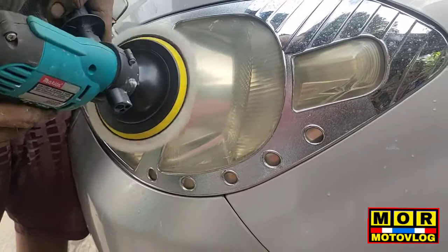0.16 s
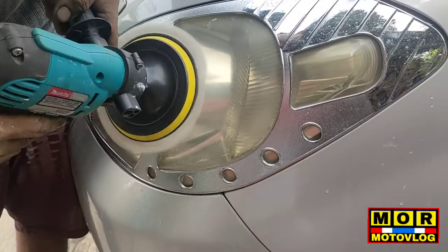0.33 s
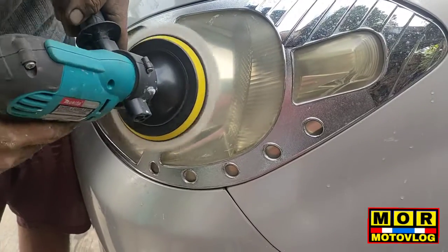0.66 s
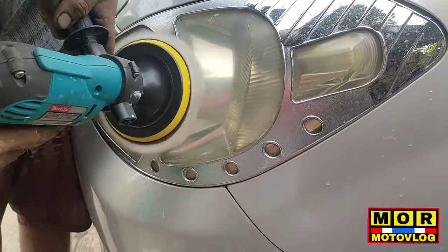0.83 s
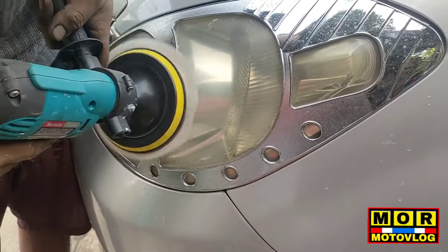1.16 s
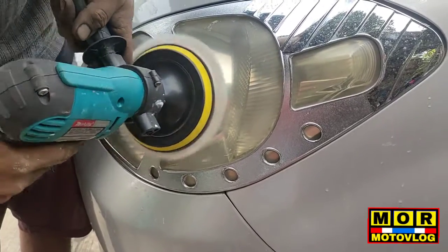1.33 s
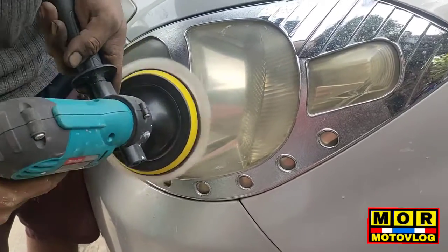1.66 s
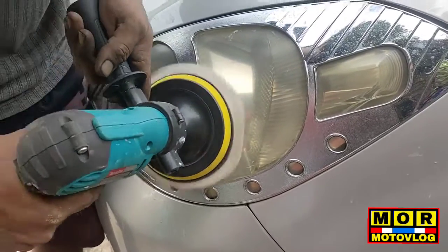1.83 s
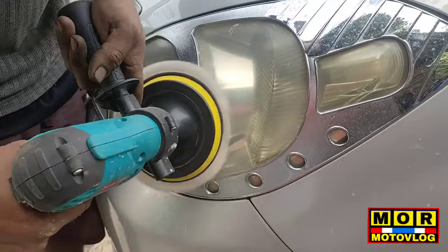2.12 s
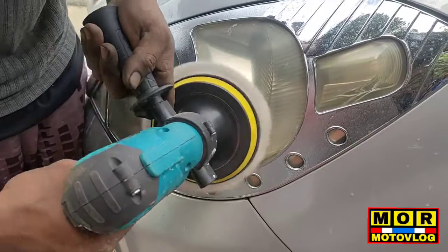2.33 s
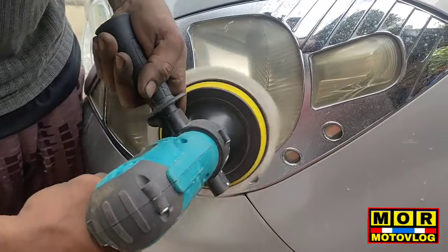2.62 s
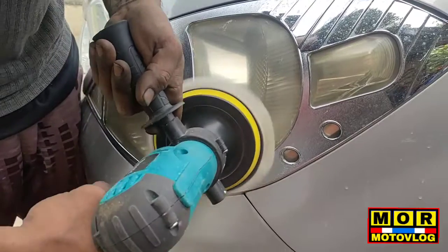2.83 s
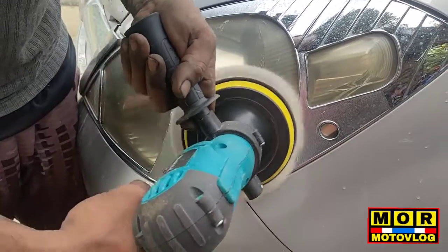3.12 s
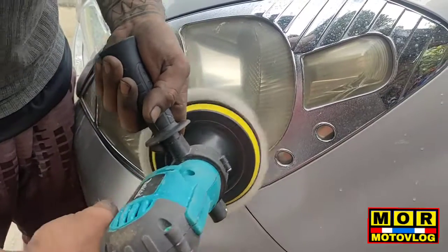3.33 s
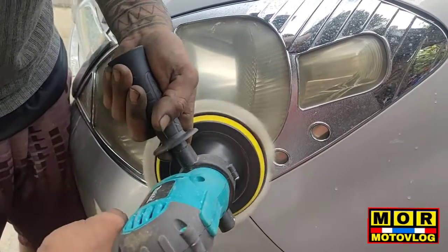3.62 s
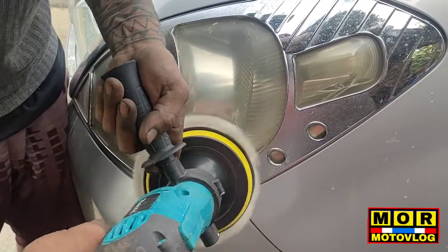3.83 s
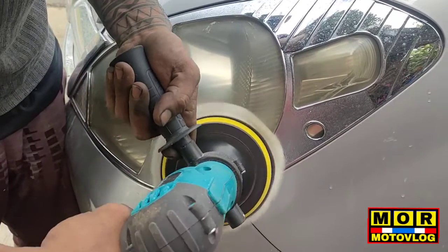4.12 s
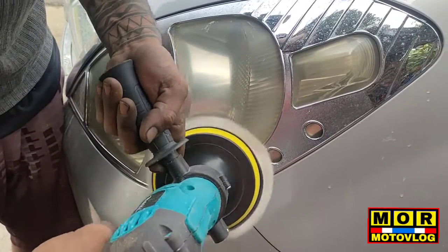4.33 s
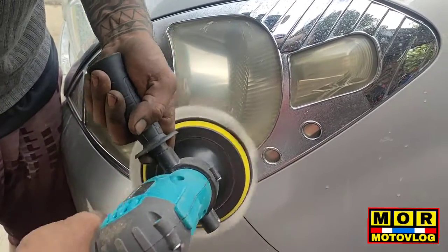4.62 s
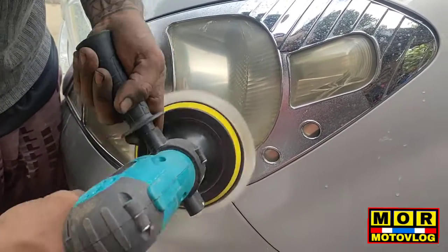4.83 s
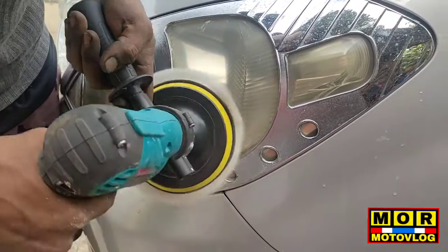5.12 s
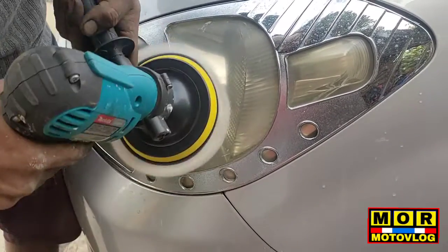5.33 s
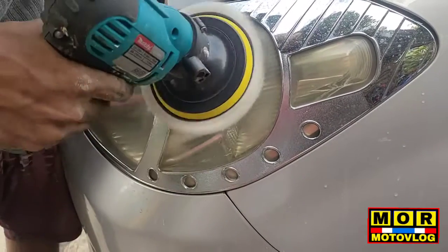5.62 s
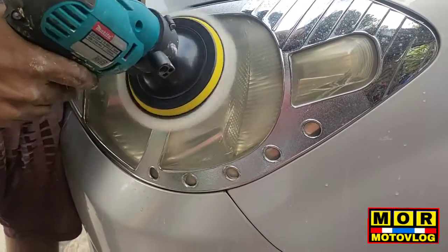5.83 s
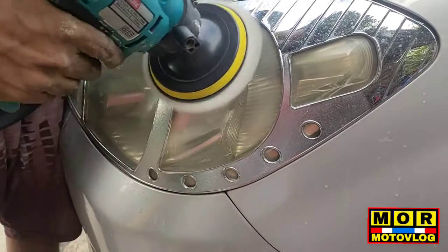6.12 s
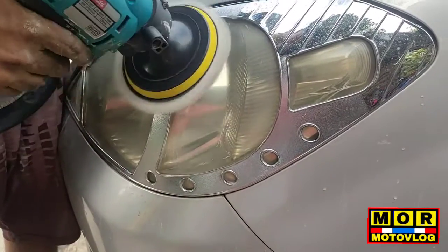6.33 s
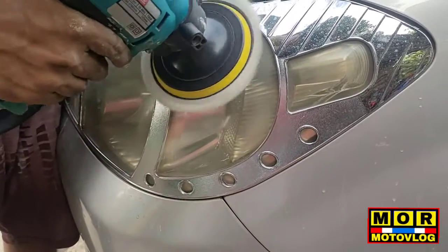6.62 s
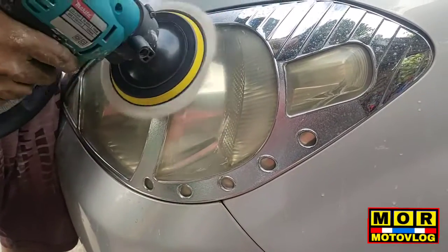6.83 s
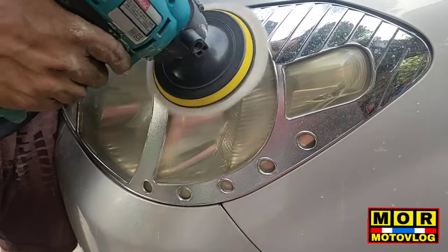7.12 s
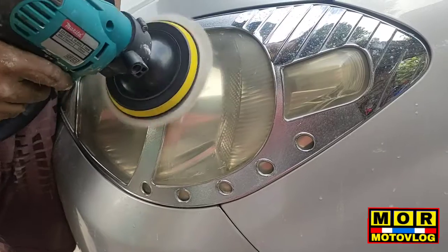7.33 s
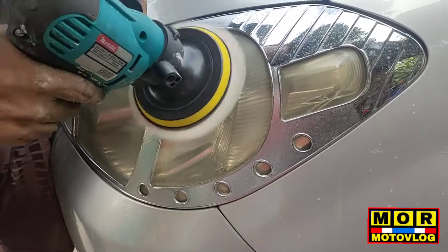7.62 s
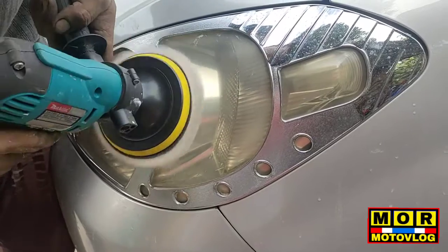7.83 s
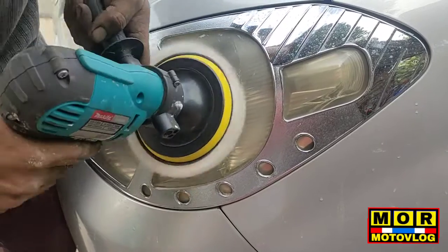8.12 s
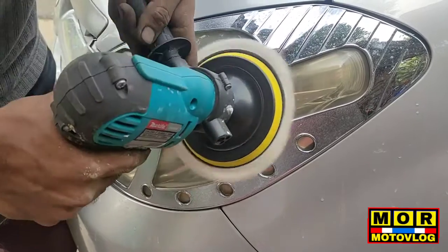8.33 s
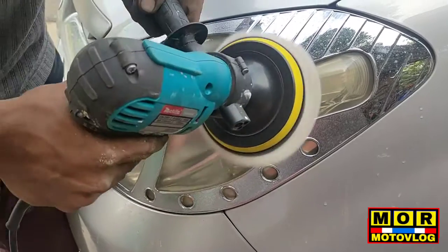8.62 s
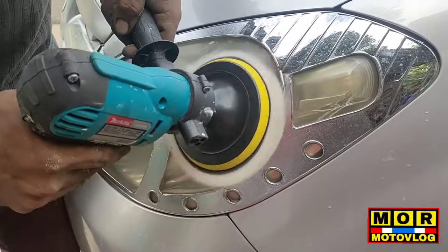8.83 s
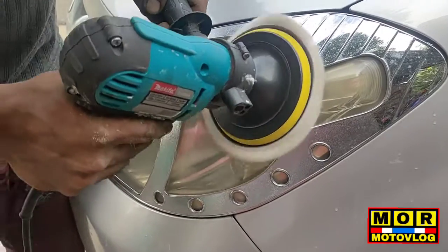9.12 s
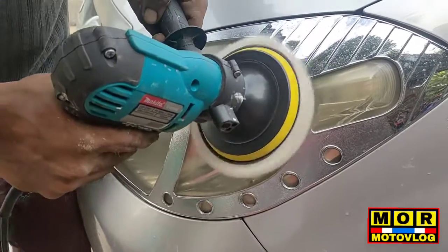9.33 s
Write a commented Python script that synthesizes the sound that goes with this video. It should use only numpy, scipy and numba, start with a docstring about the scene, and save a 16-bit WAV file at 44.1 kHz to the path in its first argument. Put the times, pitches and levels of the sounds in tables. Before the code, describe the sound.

A power buffer already at full speed whines and roars right by the microphone, outdoors, with a short reflection off the ground and shifting, slightly hollow coloration. Its tone dips under pressure around the middle, then rises and stays brighter and higher with small wavers. Broad airy hiss surges with the strokes, a soft pad drone lies beneath, weak low hums come and go, and a muffled bump occurs near eight seconds.

```python
"""A hand-held electric polisher with a wool pad works over a plastic headlight outdoors, heard in stereo close by.
Sines on multiples of the sagging and recovering rotor speed make the whine of gear teeth, fan and commutator.
Bands of noise make the pad's drone, the casing's roar and the hiss of vents and brushes; an echo off the ground
and moving hollows colour the casing, gear, vent and brush noise. The tool is held in five ways in turn.
Behind it low sine hums swell and fade over a faint noise rumble; once, struck modes make a dull bump."""
import sys
import numpy as np
from scipy import signal
from scipy.fft import rfft, irfft, next_fast_len
from scipy.io import wavfile
from scipy.ndimage import uniform_filter1d, map_coordinates
from numba import njit

SR = 44100
rng = np.random.default_rng(int(sys.argv[2]) if len(sys.argv) > 2 else 0)


def dump_mix(stems):
    """Bounce the given channels to the path in sys.argv[1] as a 16-bit WAV at rate SR."""
    frames = np.atleast_2d(stems).T  # one column per channel
    limited = np.clip(frames, -1, 1)  # hard clip at full scale
    pcm = np.round(limited * 32767).astype(np.int16)
    wavfile.write(sys.argv[1], SR, pcm)


N = 417627


def rotor_speed():
    """Rotor turns per second under the changing load; inertia rounds the corners."""
    # rotor speed before rounding: t/s, speed/(turns per s)
    rotor_curve = [(0.0, 379.2), (0.15, 380.5), (0.6, 378.0), (0.79, 382.8), (1.0, 374.4), (1.19, 378.3),
                   (1.39, 371.3), (1.59, 378.0), (1.84, 370.4), (2.0, 373.8), (2.23, 370.8), (2.5, 381.4),
                   (2.88, 379.3), (3.11, 363.8), (3.35, 360.8), (3.55, 353.0), (3.99, 354.6), (4.26, 366.8),
                   (4.42, 366.0), (4.67, 377.2), (4.92, 369.0), (5.16, 380.8), (5.48, 385.3), (5.76, 404.6),
                   (6.03, 406.8), (6.21, 413.6), (6.49, 401.3), (6.74, 407.6), (7.03, 397.6), (7.3, 407.2),
                   (7.59, 396.8), (7.8, 400.1), (8.05, 397.6), (8.27, 411.4), (8.83, 409.8), (9.06, 398.9),
                   (9.47, 393.8)]
    return uniform_filter1d(in_time(rotor_curve)[0], size=SR // 16)


def whine(speed, turns):
    """Sines locked to the rotor, rougher the higher they lie; the gear mesh beats once per turn of the pad."""
    # whine lines before the lifts and swells below: multiple of rotor speed, left level/dB, right level/dB
    lines = [(1, -55, -55), (2, -53, -54), (3, -43, -47), (4, -47, -52), (5, -37, -39), (6, -40, -41),
             (7, -47, -48), (8, -50, -50), (9, -41, -43), (10, -43, -42), (11, -48, -42), (12, -48, -41),
             (13, -53, -46), (14, -52, -46), (15, -45, -39), (16, -52, -48), (19, -56, -52), (20, -56, -49),
             (21, -66, -64), (23, -67, -66), (24, -62, -61), (25, -60, -58), (30, -65, -64), (31, -75, -67),
             (32, -61, -56), (33, -75, -75), (34, -73, -71), (35, -67, -64), (36, -64, -58), (37, -74, -71),
             (40, -71, -69)]
    # the clearest lines change with the hold: multiple -> added level/dB in each of five holds
    tilted = {1: (-8, 1, 2.5, -11, -11), 3: (-2, -2, 2, -3, -2), 6: (1, 0, 2, -8, -8),
              7: (-4, -4, -3, 3, -3), 9: (3, -1, -1, -5, -6), 10: (-2, -2, 2, -1, -2),
              15: (2, -2, -1, 1, 1), 25: (3, 3, 1, -4, -5), 32: (1, 2, -1, -2, -1), 36: (0, -2, -4, 2, -3)}
    # swell added to the gear mesh line: t/s, level/dB
    mesh_curve = [(0, 6), (1.2, -4), (1.95, -14), (2.4, 0), (3.1, -1), (3.6, -7), (5.5, -6), (6.3, 1),
                  (7.9, 0), (8.6, 5), (9.47, 4)]
    # how the casing lets the other lines out; only the change about its mean counts: f/Hz, level/dB
    skirt = [(6100, 0), (6600, -9), (7300, -9), (8300, -17)]
    # phase of the mesh line between the channels before drift: angle/rad in each hold
    mesh_apart = (1.4, 1, 1.2, 0.91, 1.33)
    pinion_teeth, gear_ratio = 5, 9.9      # gear ratio: rotor turns per pad turn
    runout = .35      # depth of the mesh beat, 0-1
    mesh_db, singing_db = 2.2, 5.5      # lift of the lines below, and from, the sixteenth multiple
    break_db_per_multiple = .12      # higher lines drop out more
    jitter, jitter_fast, jitter_per_multiple = .6, .09, .024      # phase wander: slow, fast, fast per multiple, rad

    swell = {multiple: by_hold(db) for multiple, db in tilted.items()}
    swell[pinion_teeth], = in_time(mesh_curve)
    beat = 1 + runout * np.cos(2 * np.pi * turns / gear_ratio)
    coarse_speed = speed[::64]
    size = len(coarse_speed)
    out = 0
    for multiple, left_db, right_db in lines:
        if multiple in swell:
            level_db = swell[multiple][::64] + 2 * coarse_drift(5)[:size] - .5
        else:
            skirt_db = at_hz(skirt, multiple * coarse_speed)
            level_db = skirt_db - skirt_db.mean() + 3 * coarse_drift(1.6)[:size] - 3
        level_db = level_db + (mesh_db if multiple < 16 else singing_db)
        level_db = level_db - break_db_per_multiple * multiple * abs(coarse_drift(9)[:size])

        fast_jitter = jitter_fast * (multiple > 2) + jitter_per_multiple * multiple
        wander = jitter * coarse_drift(11) + fast_jitter * coarse_drift(40)
        wander = wander[:size] + rng.uniform(0, 2 * np.pi)
        # phase between the channels, radians; the two lowest lines stay together
        apart = min(multiple / 8, 1.5) * coarse_drift(0.6)[:size] * (multiple > 2)
        if multiple == pinion_teeth:
            apart = apart / 2 + by_hold(mesh_apart)[::64]
        stray_phase = np.array([stretch(wander + apart / 2), stretch(wander - apart / 2)])
        phase = 2 * np.pi * multiple * turns + stray_phase

        gain = stretch(np.sqrt(2) * from_db(level_db))
        if multiple == pinion_teeth:
            gain = gain * beat
        out = out + from_db([[left_db], [right_db]]) * gain * np.sin(phase)
    return out


def tool_noise(turns):
    """Casing, gear head, vents and brushes; some throb slightly once per rotor turn. The pad drones below."""
    # relative colour of each part of the tool: f/Hz, level/(dB per Hz)
    casing_colour = [(450, -37), (600, -15), (710, -11), (810, -8.5), (930, -5), (1070, -4), (1210, 2.5),
                     (1440, -2.4), (1640, 2.5), (1850, -2.2), (2250, 1), (2450, -7.5), (2700, -27),
                     (2900, -60)]
    head_colour = [(2200, -30), (2400, 13.5), (2600, 14.5), (2850, 18.5), (3080, 16), (3400, 18.5),
                   (3600, 22.5), (3900, -46)]
    vent_low_colour = [(3300, -46), (3600, 0), (3900, 4.5), (4150, 5), (4500, 3), (4850, 3.5), (5150, -1.5),
                       (5500, -47)]
    vent_high_colour = [(4700, -34), (5100, 4.5), (5400, 4.5), (5700, 6.5), (6000, 4.5), (6300, 0),
                        (6500, -1.5), (6800, -52)]
    edge_colour = [(6200, -50), (6480, -11), (6650, -7), (6950, .3), (7300, -7), (7620, -4.5), (7950, -10),
                   (8300, -50)]
    brush_colour = [(7600, -50), (8000, -2), (8500, 0), (9400, 1), (10000, 2), (10500, -1.5), (11900, -1.5),
                    (12500, -13), (12800, -1.5), (14500, -4.5), (15000, -15), (15700, -10.5)]
    pad_colour = [(60, -50), (100, -6), (125, -10.5), (220, -6), (330, -8.5), (450, -10.5), (650, -10),
                  (800, -57)]
    # casing roar before sway, echo and hollows: t/s, level/dB
    casing_level = [(0, -23.5), (1, -24), (1.6, -23), (2.2, -25), (3.5, -27), (4.4, -26.5), (4.8, -27),
                    (5.1, -26.5), (5.3, -27), (5.6, -25.5), (6.3, -27.5), (7.5, -26.5), (7.75, -24.5),
                    (8, -26), (8.25, -24.5), (8.5, -25.5), (9.47, -26)]
    # vent hiss surging with the strokes; only the change about its mean counts: t/s, level/dB
    vent_level = [(0, -26), (.3, -26.5), (1.3, -25), (2.5, -24.5), (3.0, -25.5), (3.3, -27), (3.51, -26),
                  (4.91, -25.5), (5.33, -27.5), (5.75, -26.5), (5.95, -28), (6.14, -27), (6.36, -28.5),
                  (6.68, -27), (7.0, -29), (7.2, -26), (7.49, -30), (7.73, -27), (8.05, -29.5), (8.23, -25),
                  (8.57, -28), (9.02, -27), (9.47, -26.5)]
    # levels before surges, sway, echo and hollows: level/dB in each hold
    head_hold = (-27.5, -30.5, -29, -28.5, -29.5)
    low_hold = (-24, -27, -27, -25, -26)
    high_hold = (-27, -31.5, -30.5, -25, -26.5)
    edge_hold = (-42, -41.5, -38, -40, -40.5)
    fizz_hold = (-43.5, -44, -47.5, -43.5, -45)
    # pad drone, free of surges: level/dB in each hold
    pad_hold = (-40, -43, -46.5, -47.5, -46.5)
    # lean to the left before the surges: left minus right/dB in each hold
    sway_hold = (-1.1, -0.84, -1, 0.094, -0.29)
    flutter_db, flutter_per_s = .35, 22      # the tool shakes in the hands; heard in all but the pad drone

    casing_db, = in_time(casing_level)
    vent_db, = in_time(vent_level)
    surge_db = vent_db - vent_db.mean()
    # each part follows its own share of the vent surges
    head_db = by_hold(head_hold) + .49 * surge_db
    low_db = by_hold(low_hold) + surge_db
    high_db = by_hold(high_hold) + 1.83 * surge_db
    edge_db = by_hold(edge_hold) + .41 * surge_db
    fizz_db = by_hold(fizz_hold) + .47 * surge_db
    sway_db = by_hold(sway_hold) + .25 * surge_db

    throb = np.cos(2 * np.pi * turns)
    casing = roar(casing_colour, casing_db, np.arange(700, 2500, 200), slow_db=.5, fast_db=2.0)
    gear_head = roar(head_colour, head_db, np.arange(2450, 3700, 160), slow_db=1.3, fast_db=1.2)
    vent_low = roar(vent_low_colour, low_db, np.arange(3600, 5200, 200), slow_db=.8, fast_db=.9)
    vent_high = roar(vent_high_colour, high_db, np.arange(5100, 6600, 200), slow_db=.74, fast_db=1.5)
    edge = roar(edge_colour, edge_db, np.arange(6500, 8100, 250), slow_db=1.0, fast_db=4.5)
    brushes = roar(brush_colour, fizz_db, np.arange(8000, 15600, 750), slow_db=1.2, fast_db=3.6)
    upper = casing + gear_head * (1 + .25 * throb) + vent_low * (1 + .15 * throb)
    upper = upper + vent_high + edge + brushes * (1 + .12 * throb)
    pad = roar(pad_colour, by_hold(pad_hold), np.geomspace(110, 650, 9), slow_db=1.5, fast_db=2.0)
    lean_db = np.array([sway_db / 2, -sway_db / 2])
    return upper * from_db(lean_db + flutter_db * drift(flutter_per_s)), pad


def roar(spectrum, level_db, band_hz, slow_db, fast_db):
    """Stereo noise in overlapping bands; each band wavers in each channel as the reflections shift."""
    # left-right likeness of noise: f/Hz, likeness (0-1)
    likeness = [(40, .995), (100, 1), (200, 1), (300, 1), (400, 0.86), (700, 1), (1200, 0.86), (1750, 0.81),
                (2300, 0.55), (2800, 0.94), (3400, 0.44), (4400, 0.53), (6000, 0.51), (8000, 0.5),
                (15000, 0.45)]
    # lean of the stereo image: f/Hz, left minus right/dB
    lean = [(650, 0.5), (900, 0.5), (1200, 4), (1600, 1), (2000, 1), (2700, 4), (3400, -3), (4200, -2.5),
            (5200, -6.5), (6200, -5.5), (7000, -3.5), (9000, 1.5), (12000, -3), (15000, 1)]
    # each band arrives by its own shifting path: spread of the lag between channels, and its pace
    lag_stray_us, lag_strays_per_s = 44.4, 3.0

    size = next_fast_len(N)
    hz = np.maximum(np.arange(size // 2 + 1) * SR / size, 1)
    mid, side = rfft(rng.standard_normal((2, size)))
    alike = np.clip(at_hz(likeness, hz), 0, 1)
    pair = np.sqrt(1 + alike) * mid + np.sqrt(1 - alike) * side * [[1], [-1]]
    pair = pair * from_db(at_hz(spectrum, hz) + at_hz(lean, hz) * np.array([[.5], [-.5]]))
    out = 0
    for k, centre in enumerate(band_hz):
        share = np.interp(hz, band_hz, np.arange(len(band_hz)) == k)
        own = np.sqrt(1 - np.clip(at_hz(likeness, centre), 0, 1))      # share that differs between channels
        both = slow_db * coarse_drift(2.0) + (1 - own) * fast_db * coarse_drift(12)
        waver = [both + own * (slow_db * coarse_drift(2.0) + fast_db * coarse_drift(12))
                 for channel in range(2)]
        band = irfft(pair * share, size)[:, :N]
        # phase slip in one channel, alternating from band to band
        slip = k % 2
        turn = stretch(2 * np.pi * centre * lag_stray_us / 10 ** 6 * coarse_drift(lag_strays_per_s))
        quarter_turn = irfft(1j * pair[slip] * share, size)[:N]
        band[slip] = np.cos(turn) * band[slip] + np.sin(turn) * quarter_turn
        out = out + np.array([stretch(gain) for gain in from_db(waver)]) * band
    return from_db(level_db) * out / out.mean(axis=0).std()


def ground(*channels):
    """A short echo off the ground whose delay strays combs the noise into close, wavering strands."""
    echo_ms, echo_stray_ms, echo_db = (3.7, 4.6), .05, -5      # left and right delay, stray, level against direct
    combed = []
    for direct, ms in zip(channels, echo_ms):
        lag = (ms + echo_stray_ms * drift(3)) * SR / 1000
        echo = map_coordinates(direct, [np.arange(N) - lag], order=3, mode="mirror")
        combed.append((direct + from_db(echo_db) * echo) / np.hypot(1, from_db(echo_db)))
    return combed


@njit
def hollow(x, twice_cos, depth, r):
    """Takes a share of a moving resonance away."""
    ring = np.zeros_like(x)
    for i in range(2, len(x)):
        push = (1 - r * r) / 2 * (x[i] - x[i - 2])
        ring[i] = push + r * twice_cos[i] * ring[i - 1] - r * r * ring[i - 2]
    return x - depth * ring


def bodywork(left, right):
    """Echoes off the bodywork cancel narrow bands; these hollows shift with the hold, wander, open and close."""
    # hollows in what both channels share: f/Hz in each hold, depth in each hold (before flutter, limited
    # to 0-1), width/Hz
    shared_hollows = [((2110, 2000, 1807, 1923, 1910), (2.4, 0.95, 0.39, 0.27, 1.5), 102),
                      ((2510, 2560, 2440, 2530, 2530), (1, 1, 0.51, 0.85, 0.22), 295),
                      ((3180, 3030, 3000, 3280, 3020), (0.39, 0.37, 1, .3, 0.87), 154),
                      ((3650, 3580, 3300, 3530, 3560), (1.2, 0.57, 0.094, 1.37, 0.37), 325),
                      ((4240, 4470, 4490, 4610, 4800), (0.8, 0.34, 1, 0.42, .3), 112),
                      ((5070, 5100, 5130, 5380, 5000), (1, 1, 0.79, .55, 1), 204)]
    # hollows in what differs between the channels, same columns
    apart_hollows = [((2150, 2150, 2130, 2240, 2180), (.3, .6, 0.33, 0.34, 0.56), 72),
                     ((2600, 2620, 2700, 2690, 2630), (.5, .5, .95, 0.54, 0.52), 420),
                     ((3600, 3540, 3150, 3450, 3430), (0.55, .3, 0.81, 0.33, .6), 220),
                     ((4500, 4600, 4350, 4620, 4500), (.2, 0.47, 0.37, 0.98, .4), 300),
                     ((5080, 5000, 5100, 5130, 5170), (.8, .5, .3, .2, 0.79), 280)]
    pitch_stray, depth_flutter = .022, .5      # share of the pitch; depth

    parts = []
    for x, hollows in (((left + right) / 2, shared_hollows), ((left - right) / 2, apart_hollows)):
        for hold_hz, hold_depth, width_hz in hollows:
            hz = by_hold(hold_hz) * (1 + pitch_stray * drift(4))
            depth = np.clip(by_hold(hold_depth) + depth_flutter * drift(6), 0, 1)
            for share in (1, .45):      # a narrower second pass deepens the middle
                r = np.exp(-np.pi * share * width_hz / SR)
                x = hollow(x, 2 * np.cos(2 * np.pi * hz / SR), depth, r)
        parts.append(x)
    mid, side = parts
    return np.array([mid + side, mid - side])


def bump():
    """Soft knocks in quick succession ring a few low, fast-dying modes."""
    # knocks: t/s, strength/dB before the mode levels
    knocks = [(8.076, -31), (8.1, -34), (8.122, -39)]
    # modes: f/Hz, level/dB, time to fall by 60 dB/s
    modes = [(140, -5, .04), (215, 0, .05), (270, -3, .035)]
    clicks, out = np.full(N, 1e-18), 0      # a tiny offset keeps the filters out of denormal numbers
    for s, strength_db in knocks:
        clicks[round(s * SR)] = from_db(strength_db)
    for hz, level_db, t60 in modes:
        r, w = from_db(-60 / (t60 * SR)), 2 * np.pi * hz / SR
        ring_in = [0, from_db(level_db) * np.sin(w)]
        out = out + signal.lfilter(ring_in, [1, -2 * r * np.cos(w), r * r], clicks)
    return out


def hum():
    """Four low sine tones of wandering pitch and level over a faint noise rumble."""
    # background tones, before a slow random waver of level: t/s, level/dB rms
    hum_level = [(0., -36), (.5, -36), (.95, -40), (1.7, -62), (2.4, -58), (2.6, -47), (3.4, -50),
                 (3.7, -63), (4.1, -60), (4.35, -49), (5.1, -47), (5.9, -40), (6.65, -41.5), (7.1, -57.5),
                 (7.8, -54), (8.15, -43.5), (9.47, -42.5)]
    deep_level = [(0, -49), (1.7, -49), (2.4, -55), (3.4, -57), (5.1, -69), (6.6, -56), (7, -66),
                  (9.47, -61)]
    high_level = [(0, -57), (1, -55), (1.7, -76), (4.7, -74), (5.1, -57), (5.5, -66), (5.9, -74),
                  (7.1, -57), (7.8, -54), (8.15, -70), (9.25, -44), (9.47, -53)]
    early_level = [(0, -46.5), (1.2, -51.5), (2.3, -54), (3, -67), (9.47, -75)]
    # relative colour of the rumble: f/Hz, level/(dB per Hz)
    rumble_colour = [(15, -6), (30, -1), (50, 0), (65, -3), (105, -6), (125, -30)]

    # the main hum creeps up from 4 Hz below its final pitch, settling over 2.2 s
    hum_hz = 82.7 - 4 * np.exp(-np.arange(N) / SR / 2.2)
    # pitch in Hz, level curve, spread of the pitch wander in Hz
    drones = ((hum_hz, hum_level, .8), (49.5, deep_level, 2.5),
              (171, high_level, 1.5), (222, early_level, 8))
    tones = 0
    for hz, level, wander_hz in drones:
        phase = 2 * np.pi * np.cumsum(hz + wander_hz * drift(3)) / SR
        level_db = in_time(level)[0] + 1.5 * drift(5)
        tones = tones + np.sqrt(2) * from_db(level_db) * np.sin(phase)
    return tones + roar(rumble_colour, -52.5, [30, 90], slow_db=1.2, fast_db=.6)


def from_db(db):
    """Decibels to gain."""
    return 10 ** (np.asarray(db) / 20)


def in_time(rows):
    """Columns of a curve table, one value per sample."""
    s, *columns = np.transpose(rows)
    return [np.interp(np.arange(N) / SR, s, c) for c in columns]


def at_hz(points, hz):
    """Reads a spectrum on a log-frequency axis."""
    point_hz, values = np.transpose(points)
    return np.interp(np.log(hz), np.log(point_hz), values)


def by_hold(values):
    """One value for each hold, gliding between them, at every sample."""
    # the five holds of the tool: from t/s, to t/s
    holds = [(0, .4), (1.2, 2.0), (2.6, 5.1), (5.6, 7.8), (8.3, 9.47)]
    return np.interp(np.arange(N) / SR, np.ravel(holds), np.repeat(values, 2))


def coarse_drift(rate):
    """Slow chance of spread 1, one value in 64 samples: noise through a double one-pole low-pass."""
    r = np.exp(-128 * np.pi * rate / SR)
    noise = rng.standard_normal(N // 64 + 2002)
    slow = signal.lfilter([1], [1, -2 * r, r * r], noise)[2000:]      # drops the filter's run-in
    return slow / slow.std()


def stretch(coarse):
    """One value per sample from one in 64."""
    return np.interp(np.arange(N) / 64, np.arange(len(coarse)), coarse)


def drift(rate):
    """Slow chance at every sample."""
    return stretch(coarse_drift(rate))


def scene():
    """The close polisher over the background; all its noise but the pad drone reaches the left a little later."""
    # lag of the left channel: delay/microseconds in each hold
    left_lag = (104, 61, 3.6, 24, 16)
    speed = rotor_speed()
    turns = np.cumsum(speed) / SR
    (left, right), pad = tool_noise(turns)
    lag_samples = by_hold(left_lag) * SR / 10 ** 6
    late_left = map_coordinates(left, [np.arange(N) - lag_samples], order=3, mode="nearest")
    coloured = bodywork(*ground(late_left, right))
    return coloured + whine(speed, turns) + pad + hum() + bump()


def record(dry):
    """A steep elliptic low-pass cuts the top of both microphone channels."""
    top_cut = signal.ellip(12, .3, 70, 15720, fs=SR, output="sos")      # ripple dB, stop dB, cutoff Hz
    return signal.sosfilt(top_cut, dry)


dry = scene()
out = record(dry)
dump_mix(out)
```